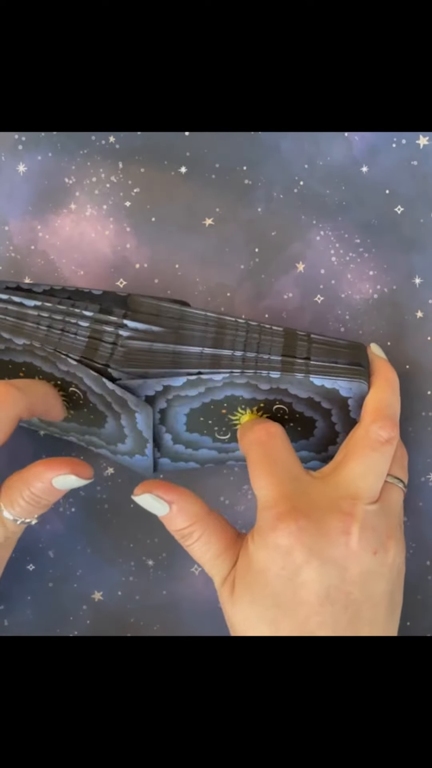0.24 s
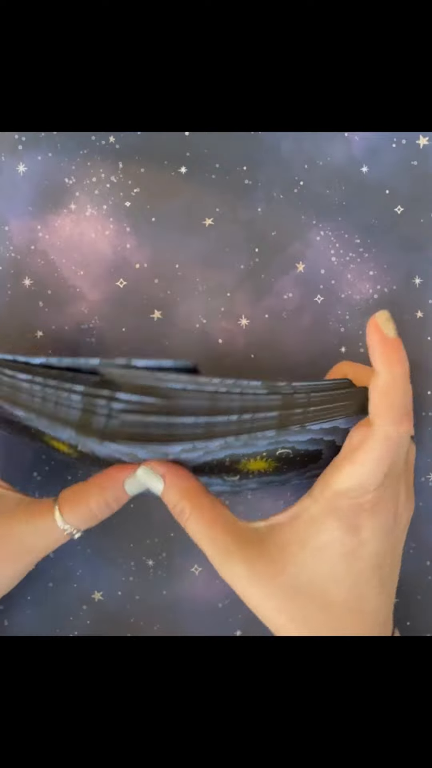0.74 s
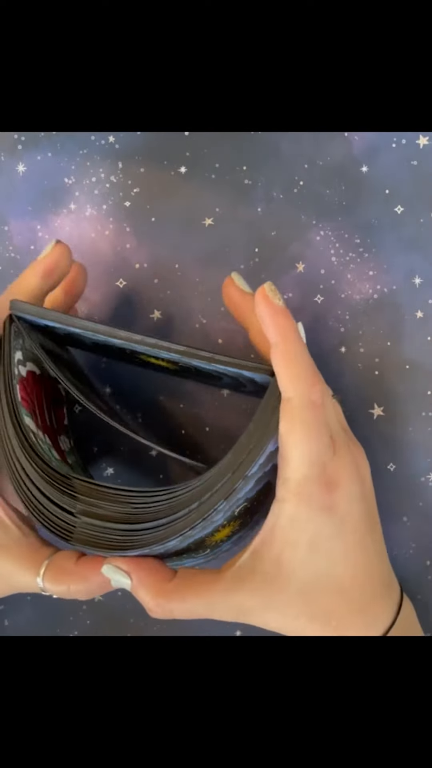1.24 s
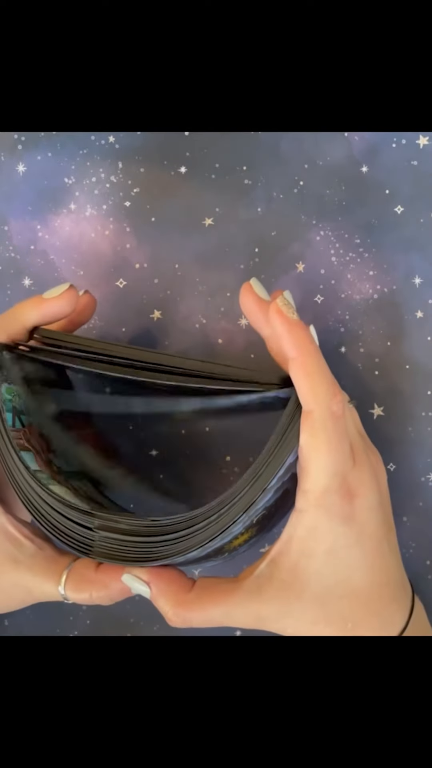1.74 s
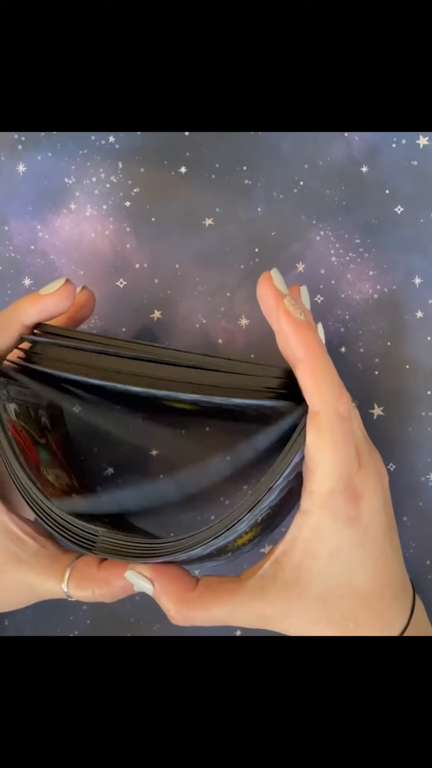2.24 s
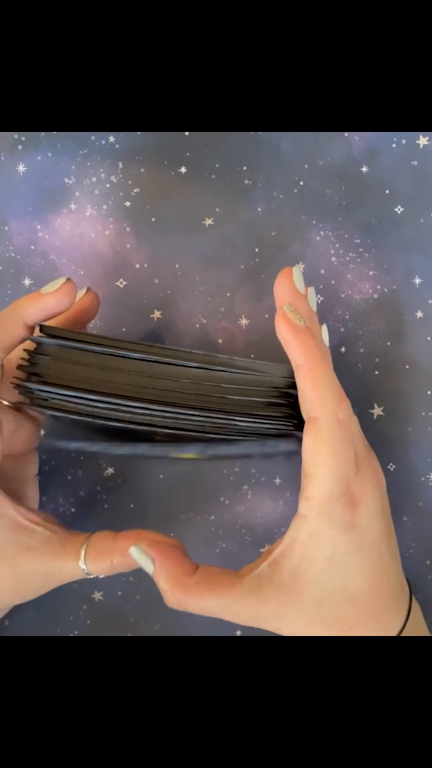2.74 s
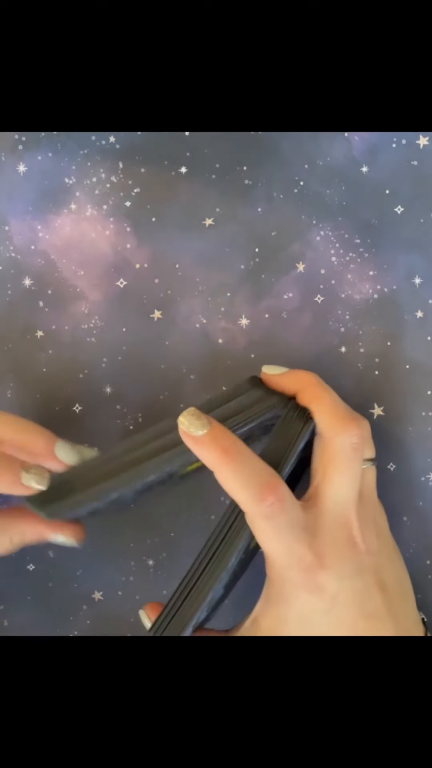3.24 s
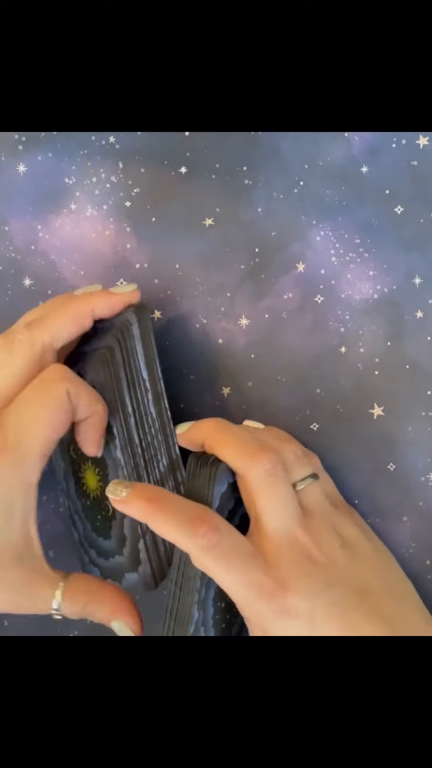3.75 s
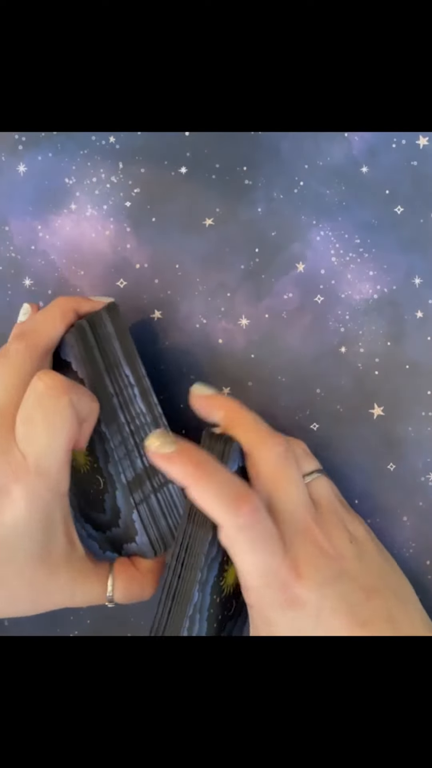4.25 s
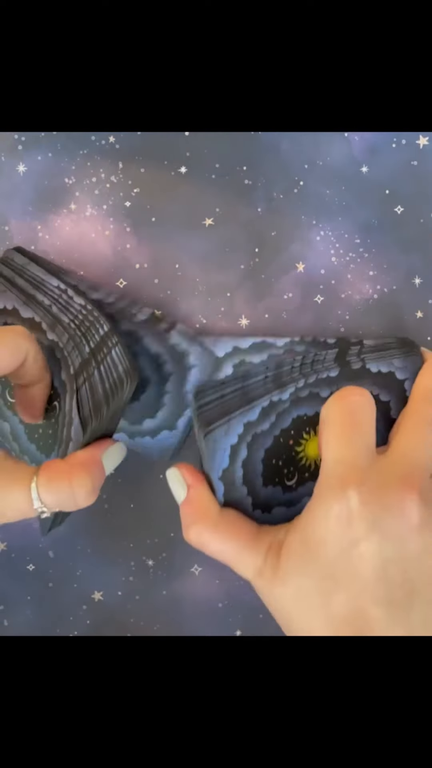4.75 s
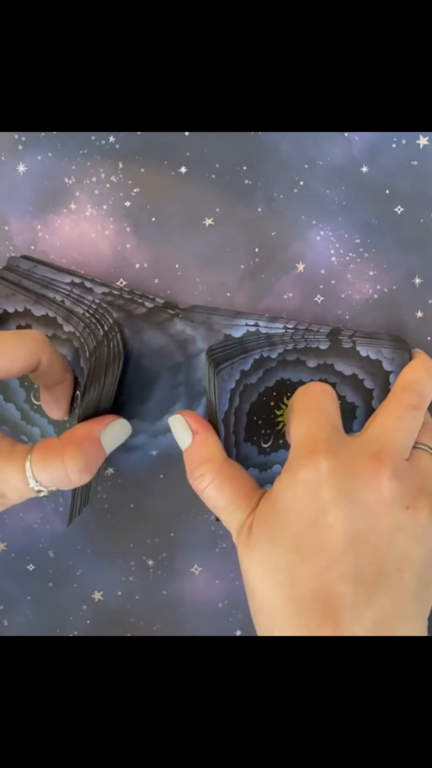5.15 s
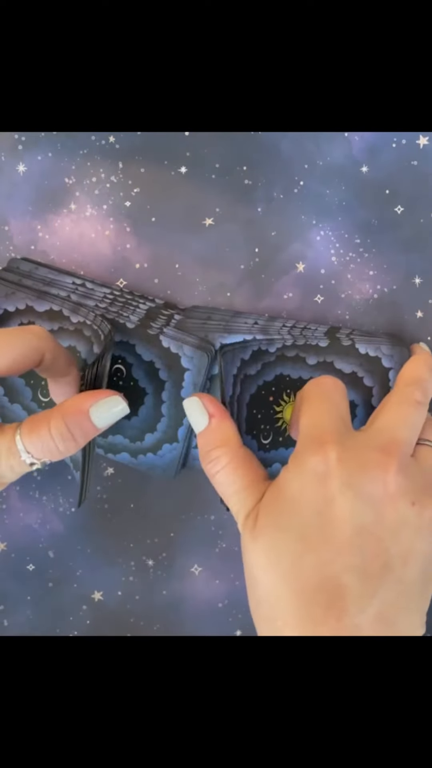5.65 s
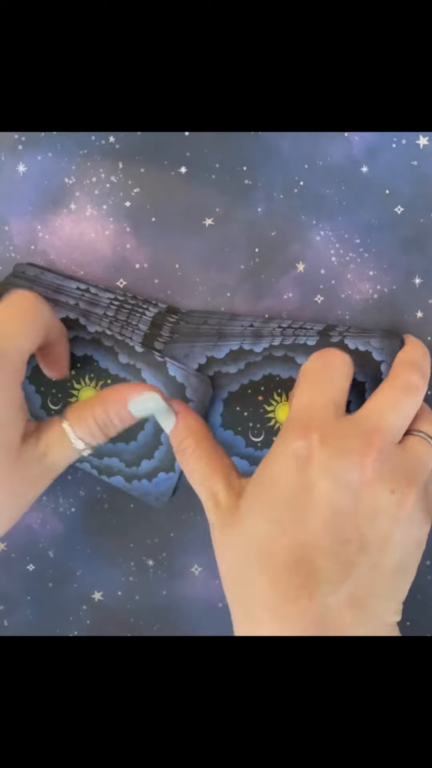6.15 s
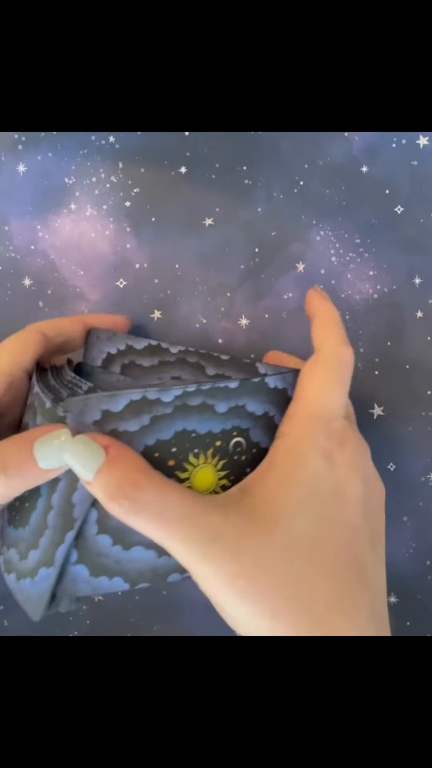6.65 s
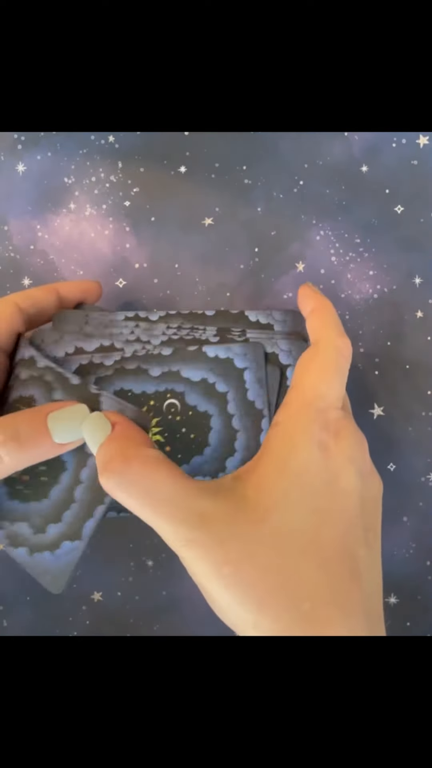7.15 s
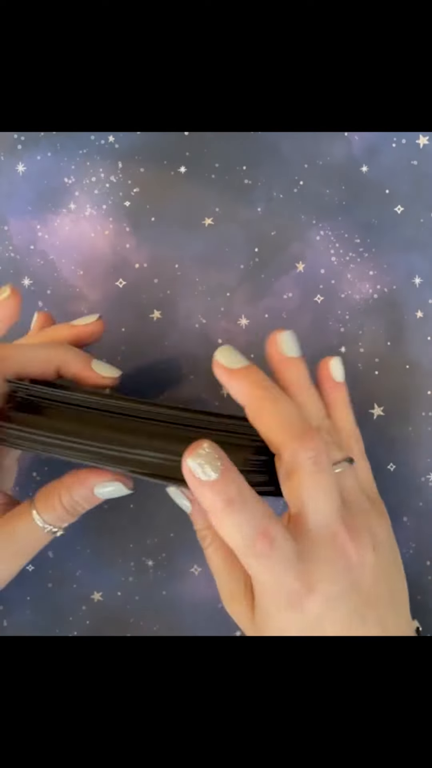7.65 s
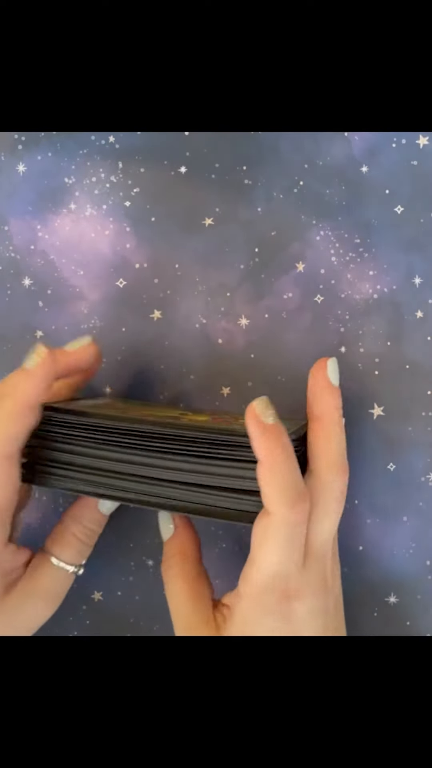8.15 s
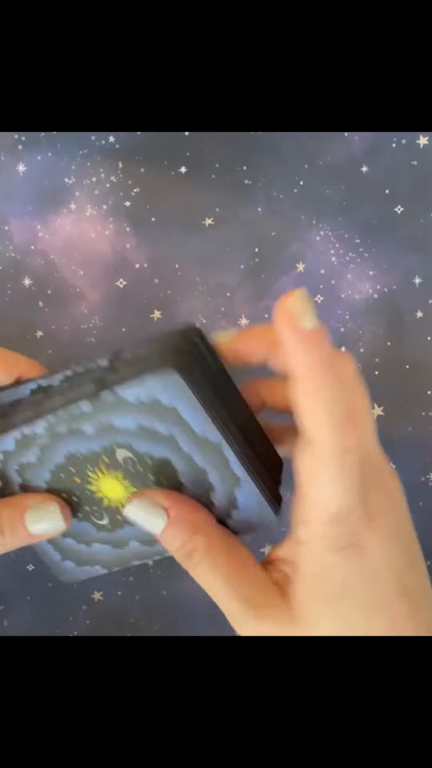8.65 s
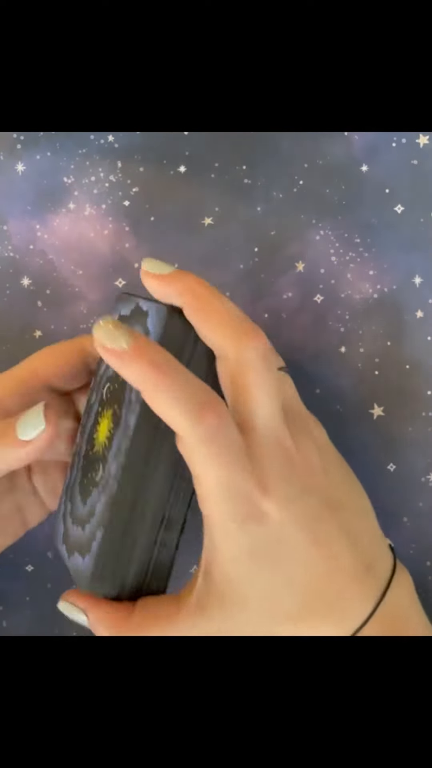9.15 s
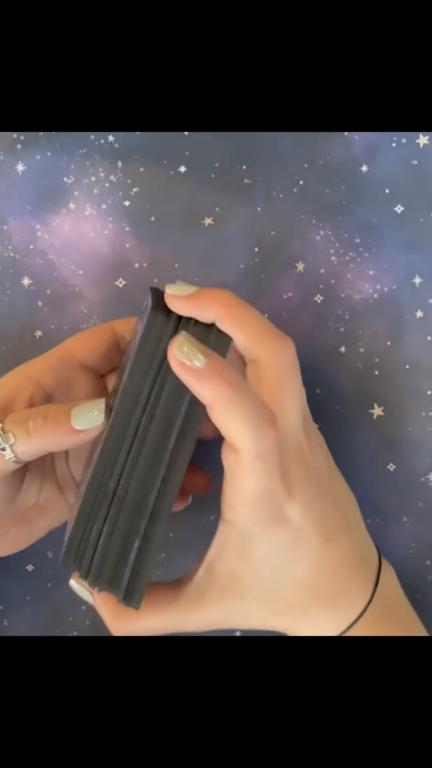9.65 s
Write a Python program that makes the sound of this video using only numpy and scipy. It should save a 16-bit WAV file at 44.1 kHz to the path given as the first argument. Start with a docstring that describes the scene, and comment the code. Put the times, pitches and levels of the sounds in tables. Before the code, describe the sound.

Close, crisp card shuffling in a small quiet room: short riffle, fluttering cascade, longer ragged riffle, hard squaring taps, faint finger rubs.

```python
"""Two hands play a deck of stiff cards on a hollow table in a small quiet room, heard through two ports.
First a short riffle snaps by, then the bent deck drops its cards flat in a duller cascade; light taps follow.
A longer riffle and a second cascade end in hard taps that square the deck; soft handling closes the scene.
Cards snap as ragged bursts and hiss as uneven friction noise; the table rings at its modes, the room echoes."""
import sys
import numpy as np
from scipy import signal
from scipy.fft import rfft, irfft, next_fast_len
from scipy.io import wavfile
from scipy.ndimage import uniform_filter1d

SR = 44100
rng = np.random.default_rng(int(sys.argv[2]) if len(sys.argv) > 2 else 0)


def to_wav(sig):
    """Store sig (one row per channel, or 1-D mono) as 16-bit WAV at the path in sys.argv[1].

    Samples outside -1..1 are clipped; the rate is SR.
    """
    pcm = np.clip(np.atleast_2d(sig), -1, 1) * 32767
    pcm = np.round(pcm).astype(np.int16)
    wavfile.write(sys.argv[1], SR, pcm.T)  # frames by channels


N = 436590


def gain_of(db):
    """Amplitude factor of a level in dB."""
    return 10 ** (np.asarray(db) / 20)


def evened(x):
    """The signal brought to rms 1."""
    return x / np.sqrt(np.mean(x ** 2) + 1e-20)


def smoothed(x, size):
    """Two running means in a row, over size samples each."""
    return uniform_filter1d(uniform_filter1d(x, size), size)


def read(points, hz):
    """Reads a curve of (f/Hz, value) points along a logarithmic pitch axis."""
    f, value = np.transpose(points)
    return np.interp(np.log(hz + 1), np.log(f + 1), value)


def coloured(x, points):
    """Causal minimum-phase filter with the given spectrum; white noise keeps its power."""
    db = np.maximum(read(points, abs(np.fft.fftfreq(4096, 1 / SR))), -100)
    log_spectrum = np.conj(signal.hilbert(np.log(gain_of(db))))
    taps = np.fft.ifft(np.exp(log_spectrum)).real[:2048]
    return signal.oaconvolve(x, taps / np.linalg.norm(taps))[:N]


def flutter(ms):
    """Slow random wander of rms 1, smoothed over the given time."""
    return evened(smoothed(rng.standard_normal(N), max(round(ms * SR / 1000), 1)))


# spectrum of the room's own noise: f/Hz, relative level/dB per Hz
QUIET_SPECTRUM = [(15, -34.5), (25, -4.5), (285, -4.5), (520, -18), (863, -26.5), (1560, -19.5),
                  (4740, -34), (6920, -23), (10400, -54.5), (14000, -17.5), (16000, -46)]
# steady hums under the noise: f/Hz, level/dB; all waver
HUM_TONES = [(57.4, -70), (297, -79), (355, -81)]
QUIET_DB = -70.5  # of the noise part common to both ports


def quiet():
    """Low uneven noise of the room, partly shared by the ports, and hums wavering in pitch and level."""
    shared, apart = (coloured(noise, QUIET_SPECTRUM) for noise in rng.standard_normal((2, N)))
    hums = np.zeros(N)
    for hz, db in HUM_TONES:
        level = gain_of(db + 3.4 * flutter(70))
        phase = 2 * np.pi * np.cumsum(hz + 1.8 * flutter(83)) / SR
        hums += level * np.sin(phase)
    level = gain_of(QUIET_DB + 1.0 * flutter(80))
    return level * (shared + 0.54 * np.array([apart, -apart])) + hums


# decay of the room's echoes: f/Hz, time to fall by 60 dB/s
ROOM_DECAY = [(200, 0.3), (700, 0.2), (2000, 0.13), (5000, 0.17), (13000, 0.06)]


def room(x):
    """Sparse echoes of random sign, each band dying at its own speed; the ports mostly share bass and top."""
    taps = np.zeros((2, SR // 2))
    grid = np.arange(260, SR // 2 - 20, 20)  # first echo after about 6 ms
    at = grid + rng.integers(0, 20, (2, len(grid)))
    np.put_along_axis(taps, at, rng.choice([-1., 1.], at.shape), 1)
    hz, t, z = signal.stft(taps, SR, nperseg=256)
    z *= gain_of(-60 * t / read(ROOM_DECAY, hz)[:, None])
    spread = read([(150, .15), (800, 1.0), (4500, 1.0), (9000, 0.19)], hz)
    apart = spread[:, None] * z[1]
    tail = signal.istft(np.array([z[0] + apart, z[0] - apart]), SR, nperseg=256)[1]
    return signal.fftconvolve(x[None], tail / np.linalg.norm(tail[0]), axes=1)[:, :N]


# modes of the hollow table top: f/Hz, relative level/dB, time to fall by 60 dB/s
TABLE_MODES = [(117, -14, .2), (183, -13, .06), (297, -3, .06), (352, 1, .09), (435, -6, .05),
               (521, -7, .035), (624, -8, .045)]


def table(push):
    """The hollow table top rings at its modes; neighbours swing in opposite sense."""
    t = np.arange(SR // 2) / SR
    ring = np.zeros(len(t))
    for k, (hz, db, t60) in enumerate(TABLE_MODES):
        ring += (-1) ** k * gain_of(db - 60 * t / t60) * np.sin(2 * np.pi * hz * t)
    return signal.oaconvolve(push, ring / np.linalg.norm(ring))[:N]


# the heel of the deck or a hand jolts the table, levels before trim:
# t/s, thud level/dB, level of the lowest table mode's boom/dB
TABLE_THUDS = [(0.054, -46, -55), (0.214, -36, -43.5), (0.689, -68.5, -58), (1.05, -57, -57),
               (1.455, -59, -53), (1.97, -61, -51), (2.325, -70, -41), (2.702, -63, -48),
               (3.435, -57, -46.5), (4.541, -56, -52), (4.788, -50, -52.5), (5.021, -47.5, -49),
               (5.145, -39.5, -51.5), (5.42, -48, -45.5), (5.635, -54.5, -45), (5.777, -41, -44),
               (5.914, -39, -50), (5.964, -40, -44), (6.668, -50, -51), (6.97, -50, -40), (7.035, -40, -38),
               (7.72, -42, -33.5), (8.48, -58, -60)]
RUMBLE_TOP_HZ, THUD_MS, BOOM_RISE_MS = 170.4, 10, 21


def thuds():
    """A short low jolt, one shove with a rumble; the lowest table mode swells and rings on."""
    t, out = np.arange(SR // 2) / SR, np.zeros(N + SR)
    u = t * 1000 / THUD_MS
    low = signal.butter(2, RUMBLE_TOP_HZ, fs=SR)
    hz, _, t60 = TABLE_MODES[0]
    swell = 2 * (1 - np.exp(-t * 1000 / BOOM_RISE_MS))
    boom = swell * gain_of(-60 * t / t60) * np.sin(2 * np.pi * hz * t)
    for s, db, boom_db in TABLE_THUDS:
        rumble = evened(signal.lfilter(*low, rng.standard_normal(len(t))))
        jolt = u * np.exp(-u) * (4.0 * np.sin(2 * np.pi * 65 * t) + 3.3 * rumble)
        out[round(s * SR):][:len(t)] += gain_of(db) * jolt + gain_of(boom_db + 2.5) * boom
    return out[:N]


# card faces rubbing with a narrow, pitched scrape: start t/s, length/s, level before flutter/dB, f/Hz
PITCHED_RUBS = [(0.42, 0.12, -62, 1800), (3.38, 0.5, -65.5, 1170), (4.166, 0.19, -68, 1732),
                (6.142, 0.11, -60.5, 1900), (6.471, 0.27, -51, 2310), (6.68, 0.078, -38.5, 2130),
                (6.785, 0.089, -45.5, 2160), (8.286, 0.068, -52, 3260), (9.727, 0.13, -61, 2160),
                (7.363, 0.18, -70.5, 2520), (7.924, 0.28, -63, 1638)]
RUB_WIDTH = .4  # bandwidth as a share of the pitch


def rubs():
    """Each rub swells and fades as one arch of noise in a band, with a fluttering level."""
    out = np.zeros(N + SR)
    for s, length, db, hz in PITCHED_RUBS:
        edges = [hz * (1 - RUB_WIDTH / 2), hz * (1 + RUB_WIDTH / 2)]
        noise = rng.standard_normal(SR // 2)
        band = evened(signal.lfilter(*signal.butter(2, edges, "band", fs=SR), noise))
        arch = np.sin(np.pi * np.minimum(np.arange(len(noise)) / SR / length, 1))
        out[round(s * SR):][:len(noise)] += gain_of(db) * arch * band
    return out[:N] * gain_of(1.8 * flutter(8.2))


def scrapes(x):
    """Patches of pitch swell and fade as the contact between cards wanders."""
    z = signal.stft(x, nperseg=256)[2]
    patches = uniform_filter1d(rng.standard_normal(z.shape), 4, axis=0)  # over pitch
    patches = uniform_filter1d(patches, 14, axis=1)  # over time
    return evened(signal.istft(z * gain_of(3.3 * evened(patches)), nperseg=256)[1][:N])


def flicks(busy, count=16):
    """Small card edges let go at random, each a short tick of its own pitch, louder in a busy deck."""
    happens = rng.random(N) < 160 / SR  # 160 ticks a second on average
    size = gain_of(3.5 * np.minimum(rng.exponential(1, N), 4)) * happens
    kind, t, out = rng.integers(0, count, N), np.arange(400) / SR, np.zeros(N)
    for k, hz in enumerate(np.geomspace(1300, 7000, count)):
        cycles = hz * t / .6
        tick = cycles * np.exp(-cycles) * np.sin(2 * np.pi * hz * t)
        out += signal.oaconvolve(size * (kind == k), tick)[:N]
    return busy * evened(np.gradient(uniform_filter1d(out, size=9)))  # a tick moves no net air


# strokes of cards and fingers over cards, levels before trim: full from t/s, swell/s, hold/s,
# rub level/dB, fine hiss level/dB, level of the drag on the table/dB
CARD_STROKES = [(0.0, .01, .2, -39, -42, -36.5), (0.285, 0.033, 0.4, -54, -57, -38),
                (0.43, 0.081, 0.026, -57.5, -50.5, -56), (0.927, 0.25, 0.004, -36.5, -32, -61),
                (0.997, .02, .14, -62.5, -106, -63.5), (1.465, .15, 0.09, -38, -33.5, -41),
                (1.61, 0.046, .26, -37.5, -30.5, -15), (1.94, .04, 0.37, -37.5, -31, -45),
                (2.329, .05, 0.11, -36.5, -30.5, -39), (2.495, .05, .24, -34, -35, -45),
                (2.809, 0.033, 0.11, -48.5, -54.5, -44), (3.011, .06, 0.033, -50.5, -50, -24),
                (3.336, 0.12, 0.04, -60, -50, -77.5), (3.4, .03, .36, -55, -51.5, -28.5),
                (4.08, 0.073, 0.0043, -61.5, -63.5, -65.5), (4.513, 0.17, 0.14, -64.5, -62, -44),
                (4.711, 0.044, 1.3, -49.5, -53.5, -23.5), (6.112, .04, 0.35, -52, -58, -57),
                (6.326, 0.032, 0.072, -52.5, -48.5, -75), (6.61, 0.12, 0.26, -40.5, -35, -61),
                (6.932, 0.073, 0.13, -32, -32, -60.5), (7.211, .04, 0.092, -49.5, -53.5, -98),
                (7.6, .12, .05, -59, -56.5, -66.5), (7.776, .04, 0.16, -46.5, -59, -23),
                (8.009, 0.041, 0.65, -55.5, -59, -26.5), (8.436, .06, 0.028, -46.5, -46.5, -23),
                (8.62, 0.12, 0.06, -75, -54.5, -72.5), (8.982, 0.072, 0.088, -63, -53, -72.5),
                (9.145, 0.038, 0.15, -62.5, -57, -56.5), (9.663, 0.097, 0.14, -62, -58, -61),
                (9.839, 0.12, 0.048, -50.5, -44, -50)]
# cards settling after a blow, relative to its loudness: levels of rub, hiss, drag/dB
SETTLE_LEVELS = [-26, -45, -45]
# friction noise rising shortly before each blow, relative to its loudness: levels of rub, hiss, drag/dB
LEAD_IN_LEVELS = [-24.5, -43, -63.5]
SWELL_DB, RELEASE_DB_PER_S = 37.5, 220.5  # rise over the swell time, fall after the hold
SETTLE_DB_PER_S, LEAD_IN_DB_PER_S = 332.5, 897


def sliding():
    """Levels in dB of rub, hiss and drag: strokes swell, hold, release; each blow has a lead-in and a settling."""
    t = np.arange(0, N + 128, 128) / SR
    power = np.full((3, len(t)), 1e-12)
    for s, swell, hold, *db in CARD_STROKES:
        rise = -SWELL_DB * np.maximum(s - t, 0) / max(swell, .005)
        release = -RELEASE_DB_PER_S * np.maximum(t - s - hold, 0)
        power += gain_of(np.add.outer(db, rise + release)) ** 2
    for s, db, *_, ms in blows():
        # a longer blow settles louder
        settle = (t > s) * gain_of(db + 10 * np.log10(ms) - SETTLE_DB_PER_S * abs(t - s))
        lead_in = (t <= s) * gain_of(db - LEAD_IN_DB_PER_S * abs(t - s))
        power += np.outer(gain_of(SETTLE_LEVELS), settle) ** 2
        power += np.outer(gain_of(LEAD_IN_LEVELS), lead_in) ** 2
    return (np.interp(np.arange(N) / SR, t, 10 * np.log10(p)) for p in power)


# spectrum of cards rubbing: f/Hz, relative level/dB per Hz
RUB_SPECTRUM = [(90, -26.5), (300, 0), (700, 0.5), (1300, 0), (2300, 2.5), (4000, -0.5), (5500, -7.5),
                (7500, -17), (11000, -29)]
# spectrum of fine hiss and edge ticks: f/Hz, relative level/dB per Hz
HISS_SPECTRUM = [(4000, -13.5), (6500, 1), (8800, 2), (11000, -3.5), (12400, -1.5), (14000, 0.5),
                 (15600, -4.5), (16600, -30.5)]
FLICK_SHARE = .25  # weight of the flicks beside the scrapes


def slide():
    """Friction noise with uneven grip, and sparse small slips of card edges."""
    rub_db, hiss_db, drag_db = sliding()
    grip = gain_of(2.0 * flutter(6.4))
    happens = rng.random(N) < 300 / SR  # 300 slips a second on average
    slips = gain_of(5.5 * np.minimum(rng.exponential(1, N), 3)) * happens
    slips = smoothed(slips, 40) * 40  # each slip lasts about a millisecond
    rub_noise, hiss_noise, drag_noise = rng.standard_normal((3, N))

    busy = np.clip((rub_db + 61.5) / 30, 0, 1)
    rub = scrapes(rub_noise) * (grip + 0.09 * slips) + FLICK_SHARE * flicks(busy)
    rub = coloured(gain_of(rub_db - 7.5) * evened(rub), RUB_SPECTRUM)

    hiss = evened(hiss_noise * (grip ** 1.8 + 0.37 * slips))
    hiss = coloured(gain_of(hiss_db - 7.0) * hiss, HISS_SPECTRUM)

    drag = evened(signal.lfilter([1, -.985], [1], drag_noise) * np.sqrt(grip))
    return rub + hiss + table(gain_of(drag_db - 8.5) * drag)


# levels in the next three tables are before trim
# cards let go by a thumb, short and bright: t/s, loudness level/dB, ring f/Hz, edge tick level/dB
RIFFLED_CARDS = [(0.042, -12.5, 2430, -12.5), (.082, -14, 1777, -15), (.093, -12, 2400, -8),
                 (.129, -22, 2560, -16.5), (0.162, -41.5, 2567, -9.5), (.169, -9, 1773, -26.5),
                 (.195, -24, 2750, -16), (0.204, -8, 2210, -3.5), (.219, -14, 4557, -30),
                 (.224, -6.5, 2306, -6), (4.744, -32, 1490, -29), (4.755, -23, 3080, -32),
                 (4.783, -29.5, 1200, -42), (4.792, -26.5, 3700, -13.5), (4.802, -27, 2320, -30),
                 (4.851, -32, 1483, -26.5), (4.869, -21, 2655, -17.5), (4.911, -27, 1160, -27),
                 (4.928, -6.5, 2520, -12), (5.002, -26.5, 1169, -29.5), (5.016, -8.5, 2488, -5),
                 (5.047, -12, 2500, -5), (5.135, -19.5, 2490, -25), (5.148, 3.5, 1952, -5),
                 (5.164, -20, 2458, -15), (5.177, -12, 895, -28), (5.248, -28.5, 2290, -20),
                 (5.262, -10, 1298, -20), (5.302, -27.5, 3548, -28), (5.34, -24.5, 2294, -28),
                 (5.351, -21, 788, -46.5), (5.373, -18, 790, -32), (5.395, -20.5, 3054, -22),
                 (5.407, -0.5, 2079, -5.5), (5.416, -7.5, 2000, -2.5), (5.422, -4, 1780, -20),
                 (5.46, -13.5, 2261, -49), (5.508, -27, 5500, -35), (5.521, -10, 2230, -33),
                 (5.57, -25.5, 4300, -35.5), (5.581, -7, 2320, -7), (5.606, -29.5, 3000, -32.5),
                 (5.616, -8, 2920, -18.5), (5.627, 1, 2920, -36.5), (5.638, -17.5, 2780, -29.5),
                 (5.757, -20, 2475, -29), (5.763, -4.5, 2430, -28), (5.772, -2.5, 2350, -24.5),
                 (5.781, -16.5, 2020, -9), (5.844, -31, 4040, -36.5), (5.856, -12, 1542, -11),
                 (5.875, -10, 1895, -15.5), (5.917, -30, 3030, -17.5), (5.927, -4, 2120, -8.5),
                 (5.962, -26.5, 2095, -48), (5.968, -10, 2695, -7), (6.025, -17, 1800, -11.5),
                 (6.036, -12.5, 1735, -52)]
# cards that fall flat out of the bent deck, duller:
# t/s, loudness level/dB, ring f/Hz, edge tick level/dB, nominal length/ms
FALLING_CARDS = [(0.955, -31, 2660, -24.5, 6.2), (1.436, -23, 1856, -48, 9.3),
                 (1.444, -11.5, 1930, -23.5, 6.5), (1.467, -24, 3350, -51.5, 19.5),
                 (1.506, -34, 780, -24, 7.4), (1.582, -24, 3000, -25, 2.2), (1.588, -20.5, 4400, -22, 4.7),
                 (1.628, -23, 2600, -58, 9), (1.659, -21.5, 4650, -28, 2), (1.914, -24.5, 2600, -24, 7.3),
                 (1.931, -25.5, 2000, -41, 27), (1.954, -14, 2750, -15, 1.9), (2.004, -30, 2400, -36, 2.5),
                 (2.015, -19.5, 2820, -34, 2), (2.047, -24, 2400, -23, 5.8), (2.081, -24.5, 2970, -62, 4.2),
                 (2.112, -23, 3420, -20.5, 4.7), (2.152, -22, 1640, -34, 4.2), (2.236, -23, 2630, -59, 3.2),
                 (2.277, -24, 810, -54, 1.5), (2.325, -18, 2450, -43, 7), (2.339, -26.5, 1320, -27, 15),
                 (2.349, -18.5, 2500, -29, 3.8), (2.478, -16.5, 2500, -24, 3.3),
                 (2.489, -24, 2330, -24.5, 8.8), (2.566, -14, 2270, -32, 1.8), (2.593, -25, 1720, -49, 3.5),
                 (2.645, -19, 2180, -21, 0.94), (2.661, -19, 1840, -15.5, 2.8),
                 (2.675, -22.5, 2340, -57, 4.1), (2.701, -18.5, 2300, -27, 4), (2.742, -13, 1940, -28, 3),
                 (6.635, -19, 2270, -24.5, 3.3), (6.76, -28, 1500, -46, 6.9),
                 (6.777, -28.5, 1880, -33, 3.6), (6.896, -28, 1800, -32.5, 4.2),
                 (6.912, -20, 1540, -18, 2.2), (6.925, -20.5, 2050, -32, 2.9), (6.941, -17.5, 1550, -21, 3),
                 (6.968, -14, 2050, -23, 3.7), (6.999, -10.5, 1430, -20, 1.6), (7.031, -9, 1000, -45, 2.2),
                 (7.041, -9, 2170, -11.5, 3.4), (7.078, -8, 2400, -21, 1.9),
                 (7.086, -8.5, 2550, -10.5, 2.6), (7.115, -15.5, 2200, -59, 2.4),
                 (7.126, -28, 1500, -28.5, 2.4)]
# the deck tapped, squared or set down:
# t/s, loudness level/dB, ring f/Hz, level of the push on the table/dB, nominal length/ms
DECK_TAPS = [(0.225, -31, 618, -28.5, 1.5), (0.819, -31, 1830, -80, 1.6), (1.023, -45.5, 1660, -37, 4.4),
             (1.21, -56, 2520, -80, 1), (1.268, -55.5, 3930, -84, 1), (2.345, -33, 825, -26, 6.5),
             (3.014, -35, 1630, -39, 3.9), (3.121, -40, 4000, -51.5, 6.2), (3.393, -26.5, 2300, -56, 3),
             (3.397, -34.5, 1200, -58, 14), (3.434, -38.5, 1170, -25.5, 6.7), (3.474, -35, 1250, -30, 5.3),
             (3.52, -40.5, 1300, -49, 3), (4.196, -53.5, 1820, -54.5, 8.1), (4.536, -44.5, 810, -38, 4.2),
             (6.665, -31, 740, -28, 10), (7.345, -30.5, 2530, -63, 2.5), (7.608, -40.5, 2270, -52, 4.5),
             (7.666, -9, 2134, -32, 1.8), (7.67, -8, 1700, -28, 2), (7.675, -11.5, 1900, -30, 6.8),
             (7.7, -19.5, 1180, -29, 14), (7.69, -12, 1640, -22.5, 3.47), (7.718, -9.5, 1715, -22, 5),
             (7.86, -37.5, 3000, -39, 2), (7.898, -27.5, 2630, -45, 5.7), (7.904, -26, 1450, -41, 6),
             (8.274, -30, 2320, -37, 2.4), (8.3, -24, 3620, -34.5, 2.5), (8.449, -38.5, 1050, -23, 16),
             (8.473, -36, 1010, -25, 14), (9.245, -40.5, 4100, -64, 2.4), (9.734, -44, 4000, -48.5, 2.3)]
RIFFLE_MS = 1.6  # nominal length
RIFFLE_PUSH_DB, CASCADE_PUSH_DB = -29, -15  # offsets of the push
TAP_TICK_DB = -23  # relative to loudness
PUSH_SHARE = 0.6  # the push grows more slowly than the loudness


def blows():
    """All blows in one form: (s, loudness, ring, tick, push, length)."""
    def push(db, offset_db):
        return offset_db - 21.5 + PUSH_SHARE * (db + 16.5)

    riffle = [(s, db, hz, tick_db, push(db, RIFFLE_PUSH_DB), RIFFLE_MS)
              for s, db, hz, tick_db in RIFFLED_CARDS]
    cascade = [(s, db, hz, tick_db, push(db, CASCADE_PUSH_DB), ms)
               for s, db, hz, tick_db, ms in FALLING_CARDS]
    taps = [(s, db, hz, db + TAP_TICK_DB, push_db, ms) for s, db, hz, push_db, ms in DECK_TAPS]
    return riffle + cascade + taps


# spectrum of a card's broad slap: f/Hz, relative level/dB per Hz
SLAP_SPECTRUM = [(60, -49.5), (250, -9), (600, -2), (1200, -1), (2300, -2.5), (3500, -5.5), (5500, -11.5),
                 (8000, -16.5), (12000, -30.5)]


def snaps():
    """Each blow is a ragged burst: a broad slap, a ring of the air gap, an edge tick, a push on the table."""
    t = (np.arange(3072) - 512) / SR  # the blow lands at t = 0
    air, push = np.zeros(N + 3072), np.zeros(N + 3072)
    soft = signal.butter(2, [180, 1200], "band", fs=SR)  # the push is a dull band of noise
    for s, db, hz, tick_db, push_db, ms in blows():
        ring_noise, slap_noise, tick_noise, push_noise = rng.standard_normal((4, len(t)))
        fall = max(ms, .5) / 1000
        rise = min(.0003 + .3 * fall, .003)
        shape = np.where(t < 0, np.exp(-(t / rise) ** 2), np.exp(-(abs(t) / fall / 1.39) ** 1.2))
        shape *= 1 + .45 * np.cos(2 * np.pi * t / .0015)  # the card lands in quick touches
        shape += 0.019 * np.exp(-abs(t) / .006) * (t < 0)  # a faint crackle leads in to each blow

        # the ring is a fraction of its pitch wide, narrower in a long blow
        r = np.exp(-np.pi * (0.087 + 0.14 / (1 + ms)) * hz / SR)
        after = 0.059 * min(hz / 2500, 1) ** 2 * np.exp(-abs(t) / .009) * (t > 0)
        strike = (ring_noise + 6.0 * (t == 0)) * (shape + after)
        ring = signal.lfilter([1, -.9], [1, -2 * r * np.cos(2 * np.pi * hz / SR), r * r], strike)

        # a blunt blow with little edge tick has little treble
        dull = np.clip((db - tick_db - 6.5) / 25, 0, .85)
        slap = coloured(slap_noise * shape, SLAP_SPECTRUM)[:len(t)]
        slap = signal.lfilter([1], [1, -dull], slap)
        tick = coloured(tick_noise * shape, HISS_SPECTRUM)[:len(t)]

        burst = gain_of(db - 8.0 - 6.7 / (1 + ms)) * evened(ring)
        burst += gain_of(db - 12.0) * evened(slap)
        burst += gain_of(tick_db - 9.0) * evened(tick)
        at = slice(round(s * SR), round(s * SR) + len(t))
        air[at] += burst * np.sqrt(np.mean(shape ** 2))
        push[at] += gain_of(push_db - 28.0) * evened(signal.lfilter(*soft, push_noise * shape))
    return air[512:N + 512] + table(push[512:N + 512])


ROOM_DB = -12  # echoes beside the direct sound


def scene():
    """Cards, thuds and quiet, with two sets of echoes slowly exchanged."""
    cards = snaps() + slide() + rubs()
    # the exchange keeps any single echo pattern from colouring the tails; one cycle takes 0.37 s
    exchange = np.arange(N) / SR * 2 * np.pi / .37
    echoes = room(cards * np.sin(exchange)) + room(cards * np.cos(exchange))
    return cards + thuds() + gain_of(ROOM_DB) * echoes + quiet()


# phase by which the left port leads: f/Hz, lead/rad
PORT_LEAD = [(100, 0), (1200, -.1), (3000, .4), (4700, 1.2), (5500, .2), (7200, 1.55), (9000, 2.8),
             (10300, np.pi), (11500, 3.4), (12400, 4.3), (14100, 5.7), (15000, 2 * np.pi), (16500, 6.4)]
EDGE_HZ, BASS_HZ = 16750, 62  # upper band limit, bass roll-off


def record(dry):
    """The ports sit apart, so they differ by a phase set by pitch; bass roll-off, soft clip, band limit."""
    size = next_fast_len(N + 4096)
    lead = read(PORT_LEAD, np.fft.rfftfreq(size, 1 / SR))
    turn = np.exp(.5j * lead * np.array([[1], [-1]]))  # half the lead to each port
    ports = irfft(rfft(dry, size) * turn, size)[:, :N]
    bass_cut = signal.butter(2, BASS_HZ, "high", fs=SR, output="sos")
    ports = np.tanh(signal.sosfilt(bass_cut, ports))
    band_limit = signal.firwin(511, EDGE_HZ, window=("kaiser", 12), fs=SR)
    return signal.oaconvolve(ports, band_limit[None], "same")


dry = scene()
out = record(dry)
to_wav(out)
```